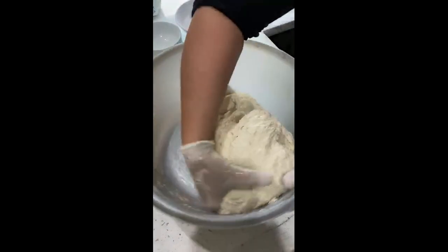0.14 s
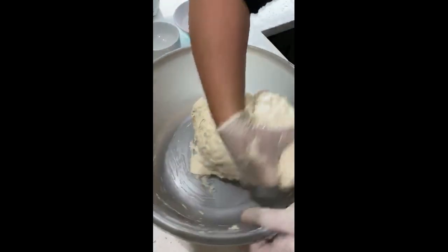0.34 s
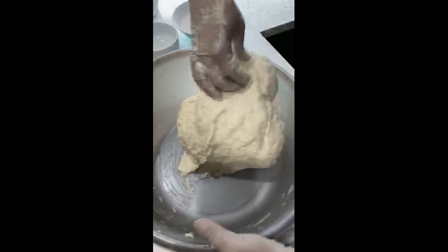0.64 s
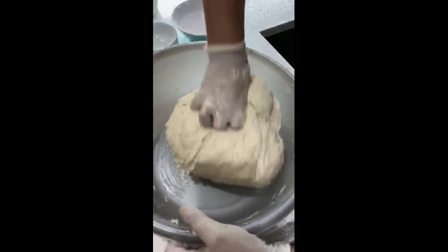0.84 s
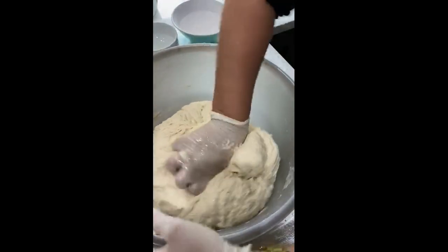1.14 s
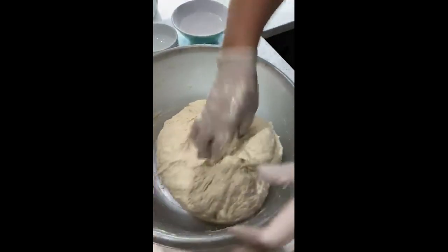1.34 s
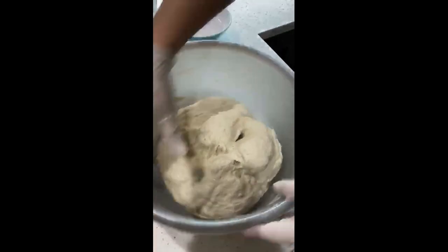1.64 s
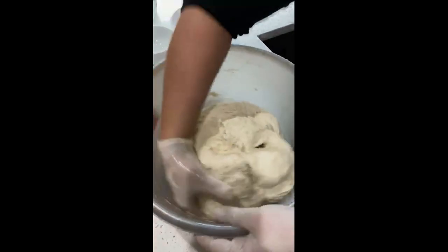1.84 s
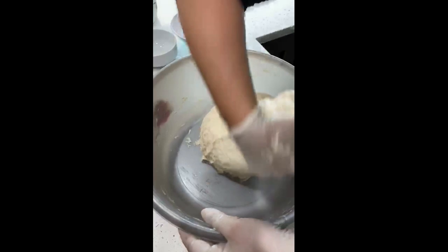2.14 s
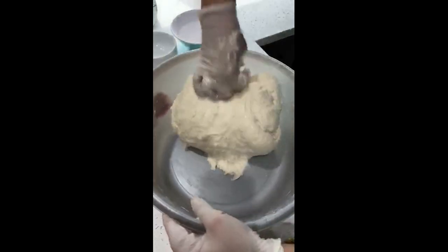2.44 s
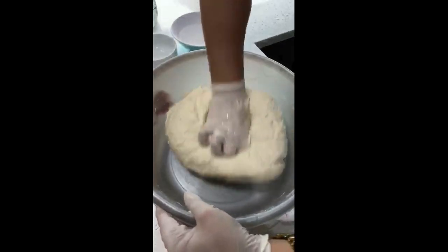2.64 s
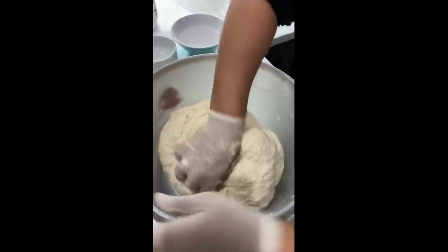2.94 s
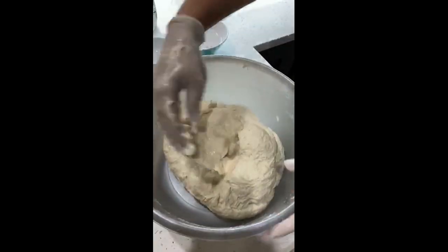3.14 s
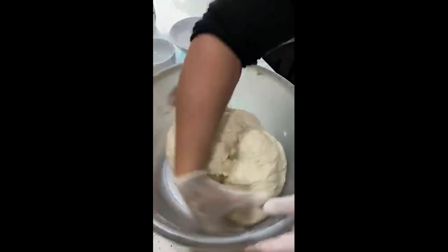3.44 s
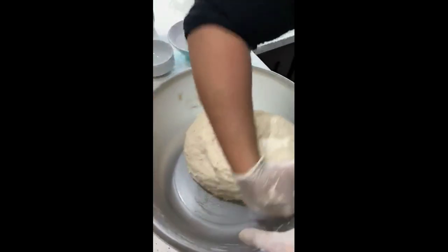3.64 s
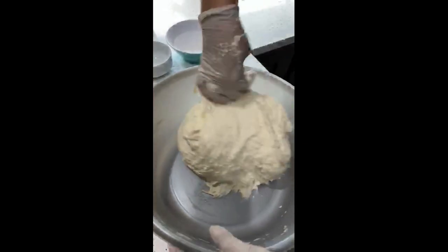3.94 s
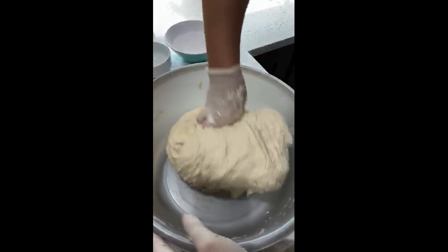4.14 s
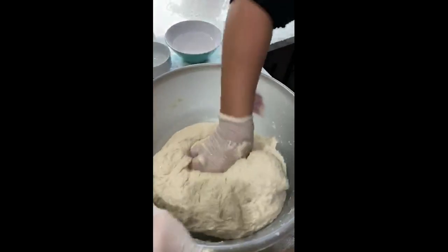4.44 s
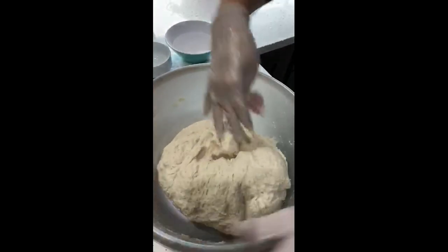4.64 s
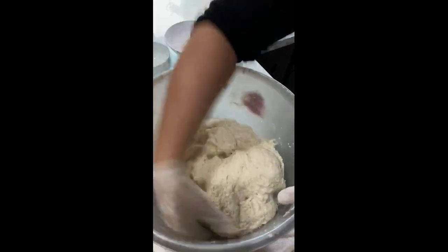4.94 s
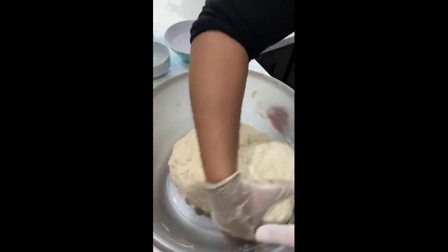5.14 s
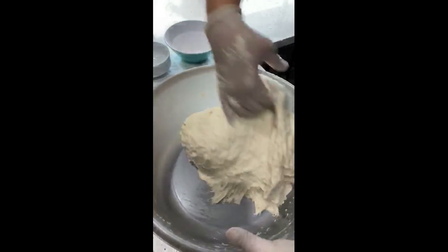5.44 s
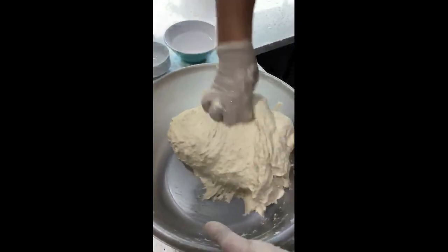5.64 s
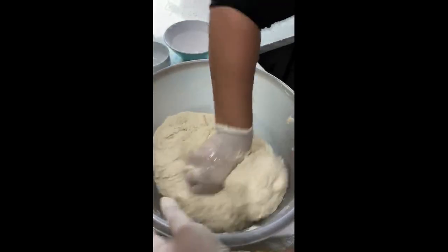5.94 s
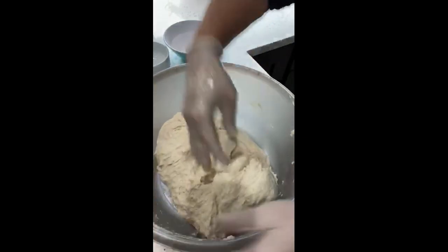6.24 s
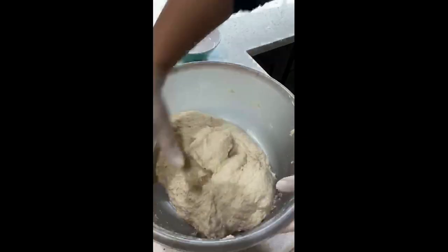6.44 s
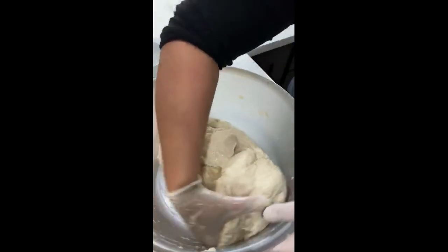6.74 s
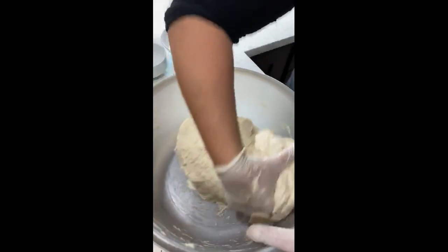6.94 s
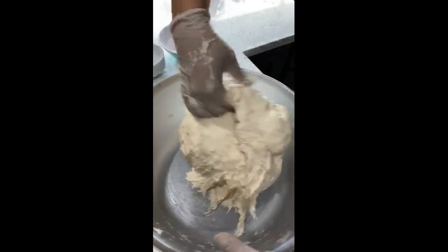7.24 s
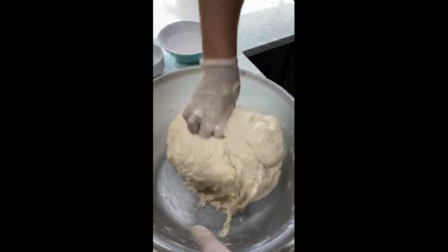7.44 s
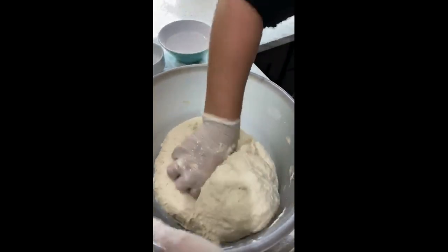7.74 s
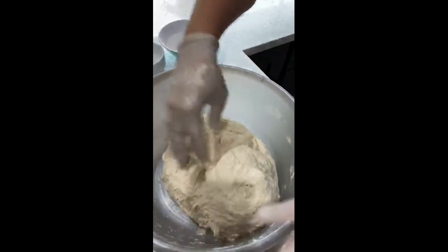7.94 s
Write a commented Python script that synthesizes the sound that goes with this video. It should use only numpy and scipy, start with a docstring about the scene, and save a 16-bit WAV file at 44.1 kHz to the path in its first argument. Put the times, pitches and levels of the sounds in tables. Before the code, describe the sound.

A gloved hand folds and punches wet dough in a metal bowl, with sticky squelches, crackling peels and dull knocks over low room rumble.

```python
"""Glove rustle, crackling peels, wet squelches and bowl knocks sound over a low rumble and a faint hum.
A gloved hand folds and punches wet dough in a steel bowl, close to a phone with two microphone ports.
Shaped noise makes the rustle and the room air; clumps of tiny wavelets make the snaps, globs and pockets.
Noise ringing in the bowl's hollow makes the sliding dough; sweeping sine waves make the knocks.
Slowly wavering tones make the rumble and hum."""
import sys
import numpy as np
from scipy import signal
from scipy.fft import rfft, irfft, next_fast_len
from scipy.io import wavfile
from scipy.ndimage import uniform_filter1d, map_coordinates

SR = 44100
rng = np.random.default_rng(int(sys.argv[2]) if len(sys.argv) > 2 else 0)


def store_wav(level_fs):
    """Save 16-bit WAV to argv[1]."""
    pcm = np.round(np.clip(np.atleast_2d(level_fs), -1, 1) * 32767)
    wavfile.write(sys.argv[1], SR, pcm.T.astype(np.int16))


N = 357210

# Background of the kitchen. Each row: time in seconds, then lower rumble, upper rumble and hum in dB.
ROOM_LEVELS = [(0.0, -35, -34, -37.5), (1.22, -33, -26, -36), (3.5, -27.5, -35.5, -37),
               (4.62, -21.5, -31.5, -49), (6.95, -28.5, -37.5, -73), (7.56, -25, -52, -91),
               (8.1, -27, -32, -67)]
# Colour of the steady room air. Each row: pitch in Hz, relative strength in dB per Hz.
AIR_COLOUR = [(25, -23), (50, 3), (110, 2.5), (205, -1.5), (450, -5), (1300, -9.5), (2500, -20.5),
              (6000, -38), (16000, -75)]
# Glove rubbing on the dough, faint while the hand is in the air. Each row: time in seconds, level in dB.
RUB_LEVELS = [(0.0, -40.5), (0.5, -30.5), (0.57, -42), (1.15, -34), (1.52, -44), (1.65, -36), (2.3, -37),
              (2.59, -43), (2.73, -35), (3.24, -40), (3.42, -36), (4.3, -36), (4.6, -29), (4.65, -48),
              (4.83, -39), (5.07, -30.5), (5.53, -39.5), (5.8, -32), (6.1, -37.5), (6.3, -41.5),
              (6.47, -46), (6.53, -34), (6.65, -40), (7.06, -32.5), (7.42, -39.5), (7.6, -34),
              (8.05, -42.5)]
# Colour of the glove's rustle. Each row: pitch in Hz, relative strength in dB per Hz.
RUSTLE_COLOUR = [(300, 7), (900, 11), (1600, 9), (3200, 3), (5000, 6), (7500, 1), (10000, 2.5), (16000, 0)]
# Sticky dough peeling off glove or bowl. Each row: start in seconds, length in seconds, level in dB.
PEELS = [(1.28, 0.12, -24), (1.672, 0.085, -27), (2.929, 0.11, -26.5), (3.331, 0.034, -31),
         (4.545, 0.046, -30.5), (5.811, 0.025, -28), (6.133, 0.1, -22), (7.515, 0.094, -27.5),
         (7.787, 0.16, -25.5)]
# Dough pushed down or scooped up in the bowl. Each row: moment of hardest push in seconds, level in dB.
SLIDES = [(0.16, -27), (1.1, -23.5), (1.7, -22.5), (2.81, -27), (3.47, -24), (4.4, -24), (5.01, -22),
          (5.989, -22.5), (6.68, -28), (7.64, -25), (8.12, -30)]
# Resonances of the air in the bowl. Each row: pitch in Hz, width in Hz, level in dB.
HOLLOW_TONES = [(720, 42, 0), (1060, 150, -11), (2300, 400, -15)]
# Bowl knocking on the counter. Each row: start in seconds, level in dB.
KNOCKS = [(0.107, -14.5), (1.332, -16), (1.462, -16), (1.709, -10), (3.319, -4), (3.979, -2.5),
          (4.859, -10), (4.935, -9.5), (4.966, -10.5), (6.16, -13), (6.423, -15.5), (6.54, -10)]
# Single strands snapping off the glove. Each row: time in seconds, level of the treble grains in dB,
# level of the lower body in dB relative to them.
SNAPS = [(0.179, -11.5, -0.5), (0.4919, -13, 4.5), (0.933, -23.5, -1), (1.148, -16, 1.5), (1.282, -16, 5),
         (1.3474, -6, -22), (1.3526, -10, -24), (1.6794, -14, -2), (1.808, -17.5, -12), (1.814, -20, -12),
         (2.948, -19, -3), (3.3513, -15, 1), (3.948, -22, -20), (4.501, -16, 1), (4.5535, -6, -27),
         (4.5661, -1.5, -28), (4.852, -24, 7), (6.135, -7, -5), (6.1522, -3, -14), (6.167, 0.5, -20),
         (6.2429, -6.5, -30), (6.518, -26.5, 14), (7.1354, -15, 1.5), (7.8273, -7, -0.5),
         (7.8883, -10, -19)]
# Wet pockets bursting. Each row: time in seconds, grain level in dB, middle pitch in Hz, length in seconds.
POCKETS = [(1.032, -21.5, 2150, .028), (1.274, -15, 1830, .012), (1.276, -14, 5340, .008),
           (1.309, -15, 1560, 0.023), (1.337, -18, 2330, .013), (1.407, -19, 840, .018),
           (1.4585, -20.5, 1180, 0.0041), (1.65, -18, 1040, .007), (1.714, -20, 864, 0.021),
           (2.113, -15, 1790, 0.0042), (2.781, -18, 780, .014), (2.9225, -12.5, 1700, 0.0027),
           (2.9336, -8, 2600, 0.0028), (2.949, -18.5, 2240, 0.04), (2.966, -21, 1430, 0.017),
           (3.016, -23, 2980, 0.02), (3.192, -21.5, 880, 0.013), (3.318, -15, 680, 0.016),
           (4.4143, -10, 695, 0.0061), (4.432, -14.5, 850, 0.0072), (4.501, -18.5, 795, 0.015),
           (4.551, -15, 2560, .02), (4.552, -14, 5720, 0.015), (4.849, -10, 1310, 0.013),
           (4.929, -15, 900, 0.0057), (4.937, -16, 1400, 0.0038), (4.972, -15, 1960, 0.0046),
           (5.321, -12, 2100, 0.0028), (5.365, -21, 2050, 0.0076), (6.145, -11.5, 860, 0.011),
           (6.15, -11.5, 2520, .014), (5.809, -18.5, 5700, 0.011), (6.146, -9.5, 4350, 0.019),
           (6.185, -14, 5060, .014), (6.248, -16.5, 4380, 0.0095), (6.533, -20, 774, 0.015),
           (7.032, -23, 2200, .009), (7.069, -29, 2140, 0.018), (7.112, -23.5, 2130, .014),
           (7.525, -15.5, 5780, 0.016), (7.802, -7.5, 733, .042), (7.803, -11, 2480, 0.037),
           (7.809, -7.5, 1580, 0.0045), (7.86, -23, 2700, .012)]
# How fast echoes die. Each row: pitch in Hz, time in seconds to fall by 60 dB.
ECHO_TIMES = [(200, 0.32), (2000, 0.19), (10000, 0.0065)]
# How alike the two sides are before the port differences. Each row: pitch in Hz, likeness from 0 to 1.
LIKENESS = [(60, 1), (190, .98), (300, .8), (1500, .74), (3500, .74), (7000, .85), (15000, .82)]
# Phase difference of the ports. Each row: pitch in Hz, lead of the left port in radians.
LEFT_LEAD = [(0, 0), (500, .1), (1030, .9), (1550, -.5), (2580, 1), (4390, 1), (5170, .1), (6800, 3),
             (8180, 3.3), (9730, 6.3), (10900, 6.3), (12600, 9.2), (14400, 9.6), (15800, 12.4)]
# Level difference of the ports. Each row: pitch in Hz, left minus right in dB.
LEFT_LEVEL = [(60, 0), (280, -1), (550, 2), (1140, 5.5), (1650, 2), (2400, -.5), (7000, 0)]

HUM_HZ = 338
TEAR_DB_PER_S, SAG_DB_PER_S, LET_GO_DB_PER_S = 488, 30, 287  # a peel's rise, slow sag and fall
PEEL_STUTTER_DB = 3  # how unevenly a peel tears
PATCHY_DB = 2.5  # strength of the shifting patches in the rustle's colour
PUSH_DB_PER_S, EASE_DB_PER_S = 59, 61  # rise and fall of a push
SQUEEZE, SQUEEZE_DB = 1.056, 4.5  # pitch factor of the squeezed hollow; dB of push over which it takes over
GLOBS, GLOB_DB, GLOB_HZ = 420, -0.5, 2970  # sticky globs: how many, dB over the rubbing, middle pitch
TICKS, TICK_DB, TICK_HZ = 120, 7, 11100  # creases flipping in the thin glove: the same three settings
GLOBS_A_PEEL, CRACKLE_DB = 14, 3  # extra globs in each peel; its fine strands, dB over the rubbing
KNOCK_T60_S, SECOND_PATH_DB = 0.12, 2  # time for a knock to fall by 60 dB; start of its second path
RAGGED_TURNS = 0.15  # random jitter of a knock's phase, in turns
THUD_HZ, THUD_DB, THUD_T60_S = 173, -4.5, 0.067  # the dough's weight landing with each knock
POCKET_SPREAD, POCKET_RING_S = 0.064, 0.0078  # scatter of log pitch; longest ring added to a grain
BRIEF_S = 0.013  # pockets shorter than this scatter wider
TOP_HZ = 15800


def amp(db):
    """Turn dB into a plain multiplier."""
    return 10 ** (np.asarray(db) / 20)


def unit(x):
    """Scale a sound to an average (RMS) strength of one."""
    return x / np.sqrt(np.mean(x ** 2) + 1e-20)


def columns(table):
    """Split a table into upright columns, ready to pair with many grains a row."""
    return np.array(table).T[..., None]


def along(points, hz):
    """Read a pitch curve, with pitch on a log axis."""
    f, v = np.transpose(points)
    return np.interp(np.log(hz + 1), np.log(f + 1), v)


def curves(rows):
    """Join the points of each column after the time, giving one value per sample."""
    s, *cols = np.transpose(rows)
    return [np.interp(np.arange(N) / SR, s, c) for c in cols]


def wobble(rate):
    """Draw a smooth random curve with the given number of knots a second."""
    knots = rng.standard_normal(int(N * rate / SR) + 4)
    return map_coordinates(knots, [np.arange(N) * rate / SR])


def filtered(x, response):
    """Change the strength and phase of each pitch by the given response."""
    m = next_fast_len(N + SR // 2)
    return irfft(rfft(x, m) * response(np.fft.rfftfreq(m, 1 / SR)), m)[..., :N]


def efforts(start, length, db, rise, sag, fall):
    """Add the power of efforts that rise, sag while held and fall at steady dB rates; return dB."""
    coarse = np.arange(0, N, 64)
    since = coarse / SR - start
    rising = rise * since.clip(None, 0)
    sagging = sag * since.clip(0, length)
    falling = fall * (since - length).clip(0, None)
    level = db + rising - sagging - falling
    total = 10 * np.log10(np.sum(amp(2 * level), axis=0) + 1e-20)
    return np.interp(np.arange(N), coarse, total)


def grains(s, hz, db, cycles):
    """Place short soft-edged wavelets; the second channel has the same grains at other phases."""
    k = np.arange(400)  # samples within a grain
    cycles = np.reshape(cycles, (-1, 1))
    life = np.clip(k / SR * hz[:, None] / cycles, 0, 1)
    at = (np.clip(s * SR, 0, N).astype(int)[:, None] + k).ravel()
    shape = amp(db)[:, None] * np.sin(np.pi * life ** 0.38) ** 2  # quick swell, slower fade

    def channel():
        phase = rng.random((len(s), 1))
        wave = shape * np.sin(2 * np.pi * (life * cycles + phase))
        return np.bincount(at, wave.ravel(), N + 401)[:N]

    return np.array([channel(), channel()])


def clumps(s, db, hz, spread, length_s, count, cycles, ring_s=0):
    """Gather grains around each moment so that they swell, then thin out."""
    when = (np.arange(count) + rng.random((len(s), count))) / count
    tone, size = rng.standard_normal((2, len(s), count))
    tone = (tone - tone.mean(axis=1, keepdims=True)) / tone.std(axis=1, keepdims=True)
    grain_db = db + 2.5 * size - 30 * (when - 0.35) ** 2
    pitch = (hz * np.exp(spread * tone)).clip(300, 15000)
    start = s + (when - 0.15) * length_s
    return grains(start.ravel(), pitch.ravel(), grain_db.ravel(), cycles + (ring_s * pitch).ravel())


def scattered(count, hz, spread, spike_db):
    """Scatter grains at chance moments, with random pitches and levels."""
    pitch = hz * np.exp(spread * rng.standard_normal(count)).clip(0.3, 3)
    level_db = spike_db * rng.standard_normal(count)
    return unit(grains(rng.random(count) * N / SR, pitch, level_db, cycles=5.0))


def kitchen():
    """Two wavering bands of rumble, a faint unsteady appliance hum and steady noise for room air."""
    low_db, high_db, hum_db = curves(ROOM_LEVELS)
    turn = 2 * np.pi * np.arange(N) / SR

    def band(hz, rate):
        return unit(np.sin(hz * turn) * wobble(rate) + np.cos(hz * turn) * wobble(rate))

    rumble = amp(low_db) * band(54, 20) + amp(high_db) * band(75, 20)
    hum = amp(hum_db + 2.5 * wobble(5)) * band(HUM_HZ, 14)
    air = unit(filtered(rng.standard_normal((2, N)), lambda hz: amp(along(AIR_COLOUR, hz))))
    return amp(-29) * air + np.array([rumble + hum, hum])


def patchy(x):
    """Raise and lower slowly shifting patches of pitch and time, the same in both channels."""
    z = signal.stft(x)[2]
    field = rng.standard_normal(z.shape[1:])
    field = uniform_filter1d(field, size=5, axis=0)  # smooth over pitch
    field = uniform_filter1d(field, size=16, axis=1)  # smooth over time
    return signal.istft(z * amp(PATCHY_DB * unit(field)))[1][:, :N]


def glove_rustle(peel_db, rub_db):
    """The rubbing glove hisses and crackles with wet strands; its level stutters more in a peel."""
    noise = patchy(rng.standard_normal((2, N)))
    hiss = unit(filtered(noise, lambda hz: amp(along(RUSTLE_COLOUR, hz))))
    crinkles = scattered(count=9000, hz=4470, spread=0.45, spike_db=3.5)
    strands = scattered(count=2500, hz=1980, spread=0.49, spike_db=8)
    tearing = amp(peel_db - rub_db)  # near 1 where the peel dominates
    stutter_db = 1.63 * wobble(70) + PEEL_STUTTER_DB * tearing * wobble(160)
    return amp(rub_db + stutter_db) * (amp(6.5) * hiss + amp(-6) * crinkles + amp(-6.82) * strands)


def hollow(f):
    """Air held between dough and bowl rings at a few resonances, with alternating signs."""
    total = 0
    for k, (centre, width, db) in enumerate(HOLLOW_TONES):
        resonance = 1j * f * width / (centre * centre - f * f + 1j * f * width)
        total = total + (-1) ** k * amp(db) * resonance
    return total


def dough_slides():
    """Sliding dough sounds the bowl's hollow; a hard push blends over to a squeezed, higher hollow."""
    s, db = columns(SLIDES)
    press_db = efforts(s, 0, db, PUSH_DB_PER_S, 0, EASE_DB_PER_S)
    noise = rng.standard_normal((2, N)) * amp(1.5 * wobble(40))
    blend = np.clip(1.5 + (press_db - db.max()) / SQUEEZE_DB, 0, 1) * np.pi / 2
    relaxed = filtered(noise[::-1], hollow)
    squeezed = filtered(noise, lambda f: hollow(f / SQUEEZE))
    return amp(press_db) * unit(np.cos(blend) * relaxed + np.sin(blend) * squeezed)


def globs(rub_db):
    """Sticky globs and glove ticks come by chance, as loud as the rubbing; globs crowd into peels."""
    start, length, _ = columns(PEELS)

    def some(s, db, hz, tones, **shape):
        tone, size = rng.standard_normal((2, *s.shape))
        level_db = rub_db[(s * SR).astype(int)] + db + 3 * size
        pitch = hz * np.exp(tones * tone.clip(-1.5, 2))
        return clumps(s, level_db, pitch, count=8, **shape)

    def anywhere(count):
        return rng.random((count, 1)) * (N - 1) / SR

    def peeling(count):
        return (start + length * rng.random((len(PEELS), count))).reshape(-1, 1)

    wet_times = np.vstack([anywhere(GLOBS), peeling(GLOBS_A_PEEL)])
    wet = some(wet_times, GLOB_DB, GLOB_HZ, 0.56, spread=0.18, length_s=0.01, cycles=0.84, ring_s=0.0022)
    crackle = some(peeling(2 * GLOBS_A_PEEL), CRACKLE_DB, GLOB_HZ, 0.29,
                   spread=0.51, length_s=0.00065, cycles=2.34)
    ticks = some(anywhere(TICKS), TICK_DB, TICK_HZ, 0.079, spread=0.29, length_s=0.0035, cycles=10.5)
    return wet + crackle + ticks


def hand():
    """Rubbing and peeling add their power to set the glove's level; sliding dough has its own."""
    peel_db = efforts(*columns(PEELS), TEAR_DB_PER_S, SAG_DB_PER_S, LET_GO_DB_PER_S)
    rub_db = 10 * np.log10(amp(2 * curves(RUB_LEVELS)[0]) + amp(2 * peel_db))
    return glove_rustle(peel_db, rub_db) + dough_slides() + globs(rub_db)


def knocks():
    """Bending waves in the counter bring high pitches first, by two paths, with a thud of dough."""
    out, t = np.zeros(N + SR), np.arange(SR // 8) / SR
    turns = 1.7 * np.log(1 + t / 0.0009) + 30 * t  # the pitch slides down
    rise = 1 - np.exp(-t / 0.0025)

    def path(turns):
        jitter = RAGGED_TURNS * map_coordinates(rng.standard_normal(40), [t * 250])
        return np.sin(2 * np.pi * (turns + jitter))

    for s, db in KNOCKS:
        wave = path(turns) + amp(SECOND_PATH_DB - 60 * t / 0.015) * path(2.25 * turns)
        knock = amp(db - 60 * t / KNOCK_T60_S) * rise * wave
        thud = amp(db + THUD_DB - 60 * t / THUD_T60_S) * np.sin(2 * np.pi * THUD_HZ * t)
        out[round(s * SR):][:len(t)] += knock + thud
    return np.array([out[:N], np.roll(out[:N], 40)])  # the second channel is 40 samples later


def snaps():
    """A snapping strand is a short clump of grains spread over the treble, with a lower body."""
    s, db, body_db = columns(SNAPS)
    treble = clumps(s, db, 5260, 0.555, 0.0028, count=16, cycles=6.5)
    body = clumps(s, db + body_db, 1320, 0.7, 0.00281, count=6, cycles=3.8)
    return treble + body


def wet_pockets():
    """Bursting pockets gurgle near one pitch; brief ones scatter wider and sound like broad clicks."""
    s, db, centre_hz, length_s = columns(POCKETS)
    spread = POCKET_SPREAD * np.maximum(1, BRIEF_S / length_s)
    ring_s = np.minimum(0.5 * length_s, POCKET_RING_S)
    return clumps(s, db, centre_hz, spread, length_s, count=14, cycles=1.0, ring_s=ring_s)


def walls(x):
    """The room answers with a delayed noise tail in which each pitch dies at its own speed."""
    hz, t, z = signal.stft(rng.standard_normal((2, SR // 2)), SR, nperseg=256)
    fade = amp(-60 * t / along(ECHO_TIMES, hz)[:, None])
    tail = signal.istft(z * fade, SR, nperseg=256)[1]
    tail = tail / np.linalg.norm(tail[0])
    delayed = np.pad(x, ((0, 0), (300, 0)))  # samples before the first echo
    return signal.fftconvolve(delayed, tail, axes=1)[:, :N]


def ports(pair):
    """Mix a sound and its diffuse partner into left and right, less alike at some pitches."""
    def mix(hz):
        turn = np.arccos(np.clip(along(LIKENESS, hz), -1, 1)) / 2
        return np.array([np.cos(turn), np.sin(turn)])

    mid, side = filtered(pair, mix)
    return np.array([mid + side, mid - side])


def gain_control(x, knee_db, release_s, slope):
    """Loud bursts pull the gain down; it creeps back afterwards, so the room dips behind them."""
    keep = np.exp(-1 / (release_s * SR))
    power = signal.lfilter([1 - keep], [1, -keep], np.mean(x ** 2, axis=0))
    return x * (1 + power / amp(2 * knee_db)) ** -slope


def scene():
    """Add the hits, their echoes, the hand and the kitchen, then spread them over two ports."""
    hits = knocks() + snaps() + wet_pockets()
    return ports(kitchen() + hand() + hits + amp(-15) * walls(hits))


def record(dry):
    """Ports differ in phase and level by pitch; gain control, soft clipping and a treble cut follow."""
    f, lead = np.transpose(LEFT_LEAD)
    side = np.array([[0.5], [-0.5]])  # half the difference goes to each port

    def port_response(hz):
        return amp(side * along(LEFT_LEVEL, hz)) * np.exp(1j * side * np.interp(hz, f, lead))

    x = filtered(dry, port_response)
    x = gain_control(x, knee_db=-18.5, release_s=1.0, slope=0.51)
    x = x / (1 + np.abs(x / 1.05) ** 6) ** (1 / 6)  # round off the peaks
    return filtered(x, lambda hz: hz < TOP_HZ)


dry = scene()
out = record(dry)
store_wav(out)
```